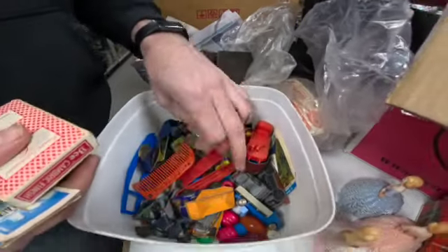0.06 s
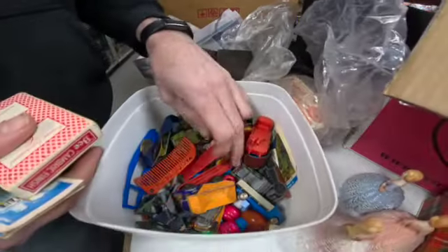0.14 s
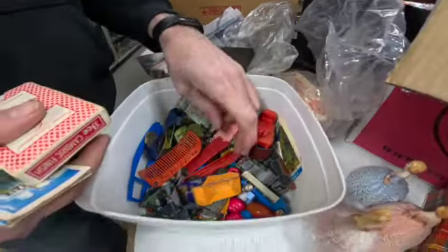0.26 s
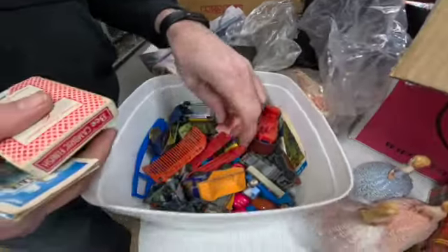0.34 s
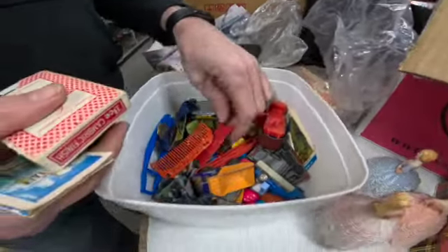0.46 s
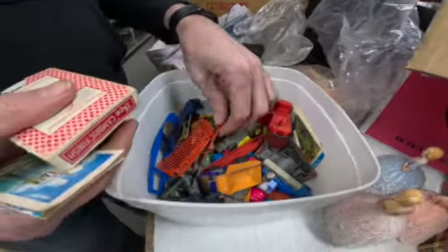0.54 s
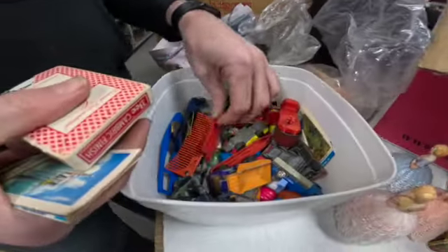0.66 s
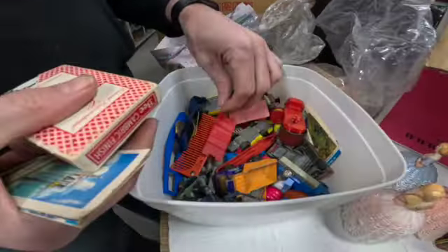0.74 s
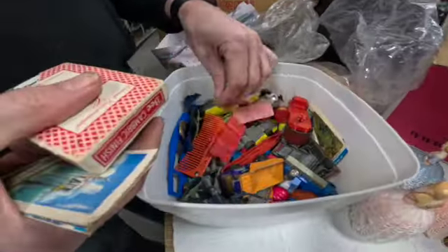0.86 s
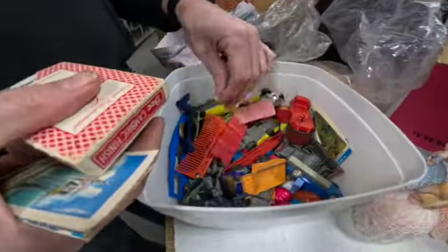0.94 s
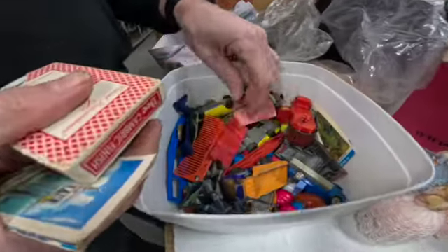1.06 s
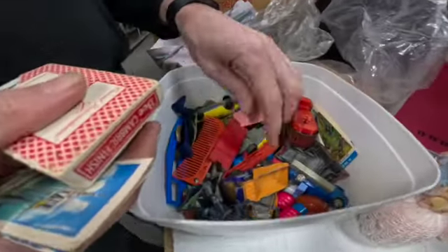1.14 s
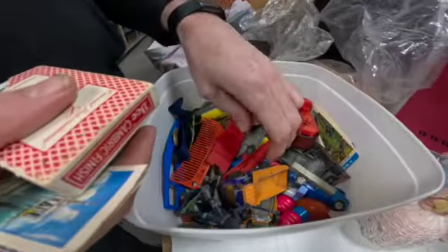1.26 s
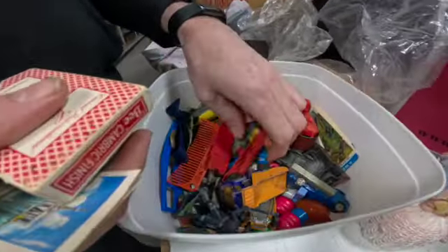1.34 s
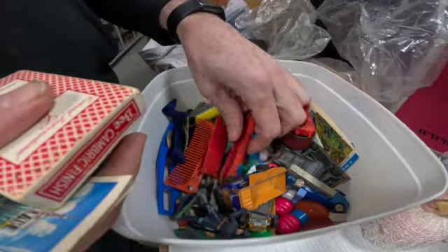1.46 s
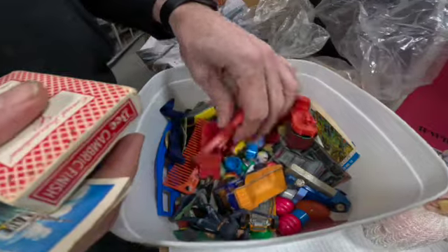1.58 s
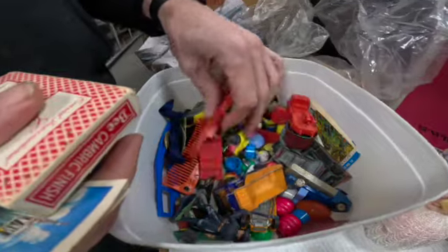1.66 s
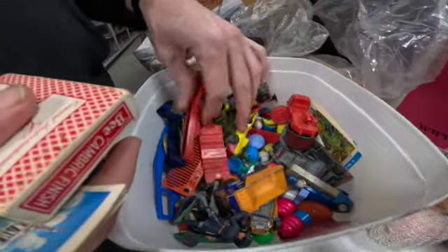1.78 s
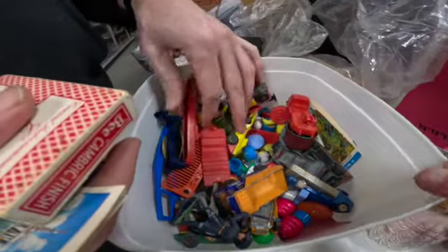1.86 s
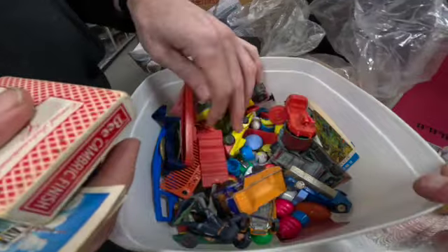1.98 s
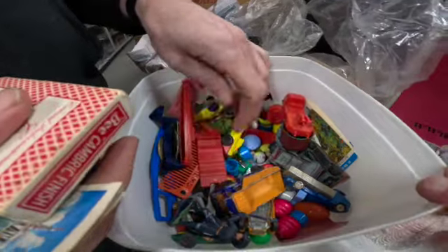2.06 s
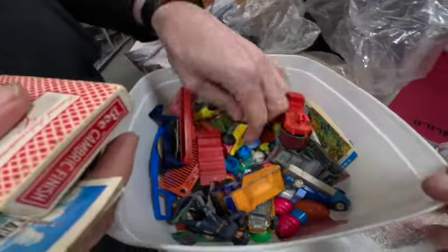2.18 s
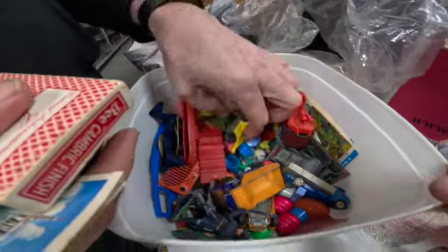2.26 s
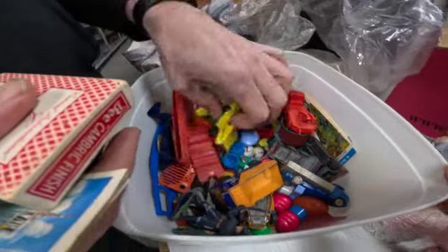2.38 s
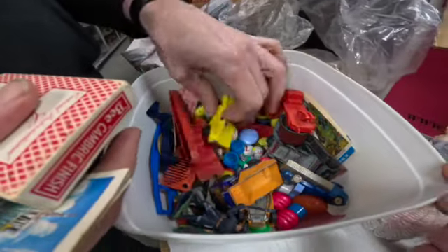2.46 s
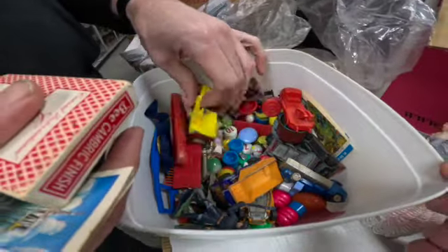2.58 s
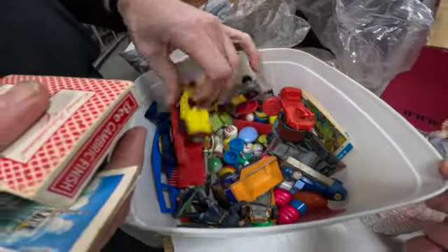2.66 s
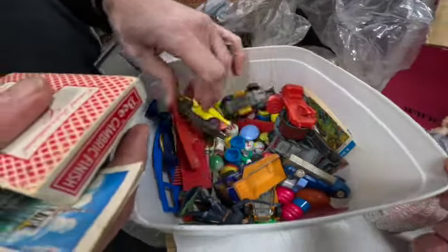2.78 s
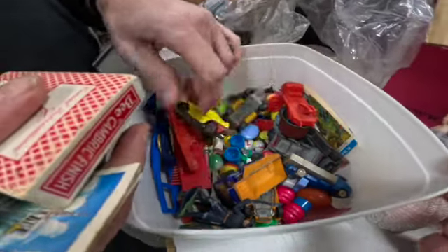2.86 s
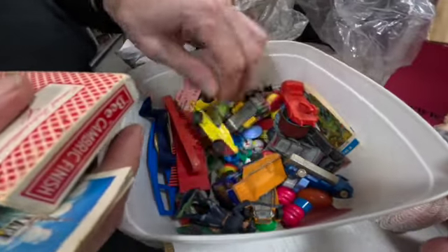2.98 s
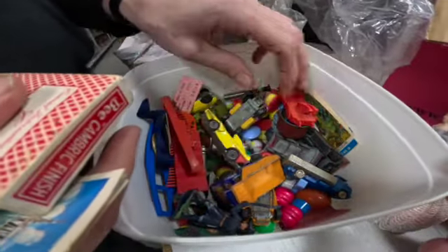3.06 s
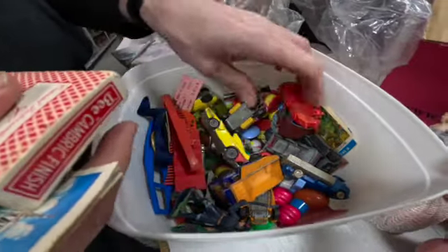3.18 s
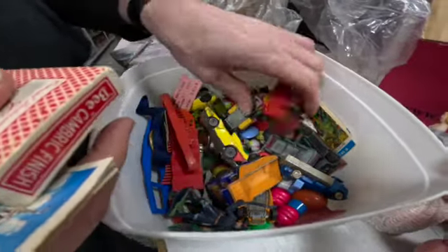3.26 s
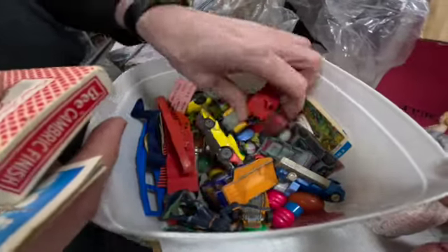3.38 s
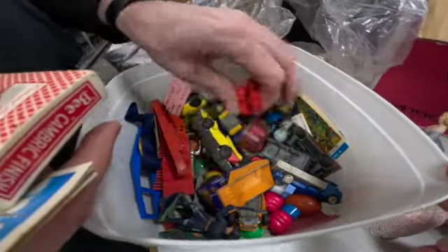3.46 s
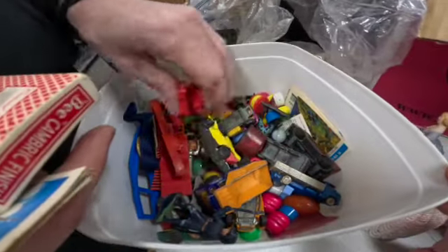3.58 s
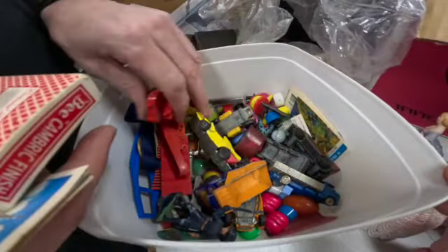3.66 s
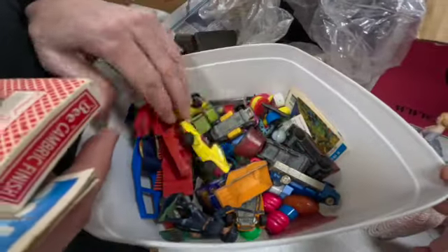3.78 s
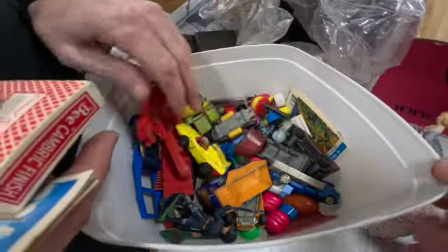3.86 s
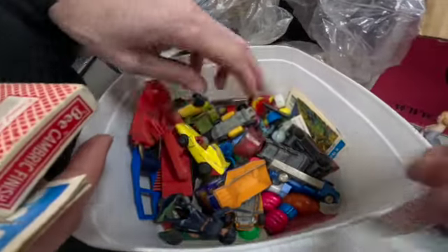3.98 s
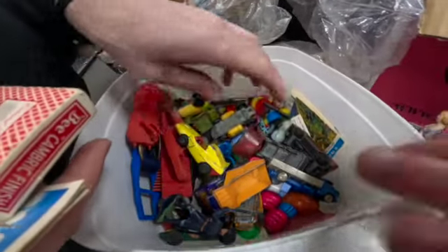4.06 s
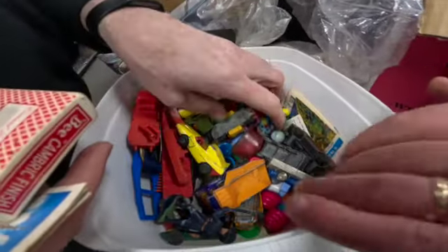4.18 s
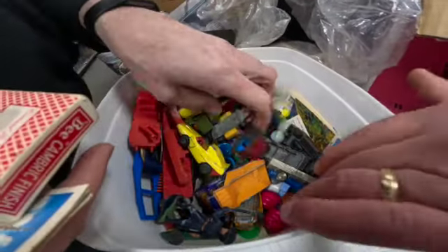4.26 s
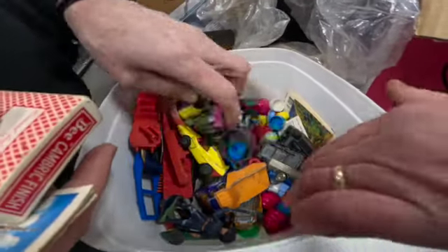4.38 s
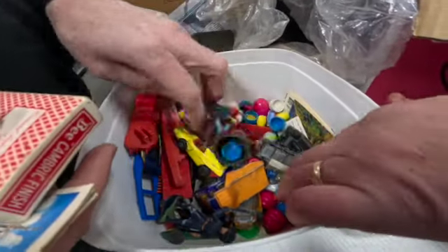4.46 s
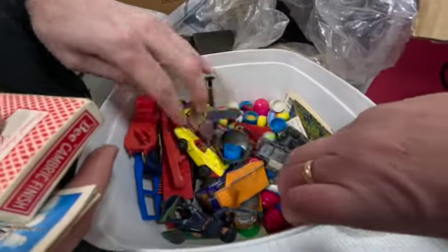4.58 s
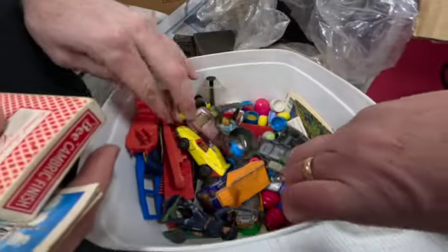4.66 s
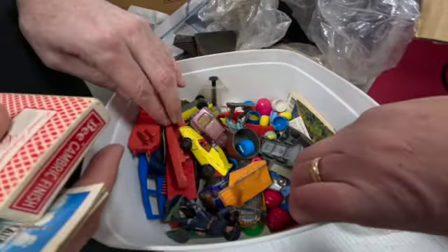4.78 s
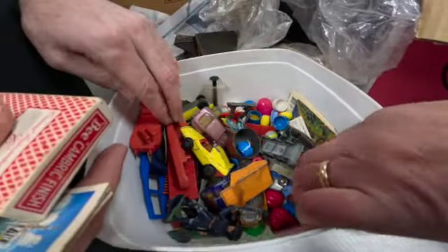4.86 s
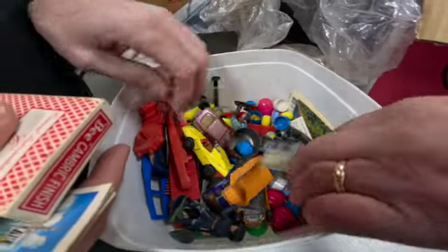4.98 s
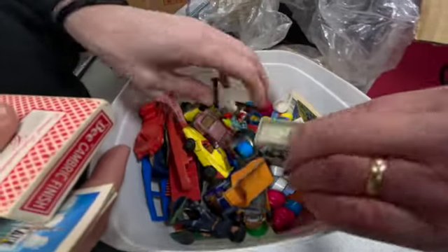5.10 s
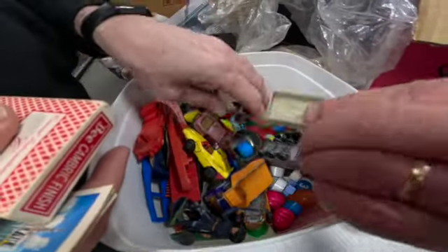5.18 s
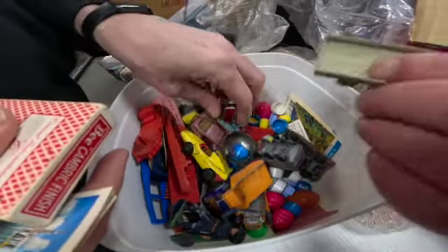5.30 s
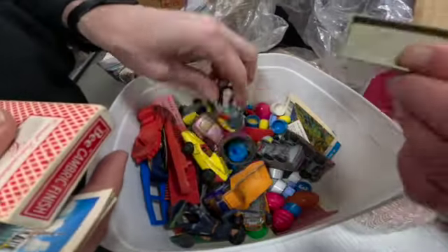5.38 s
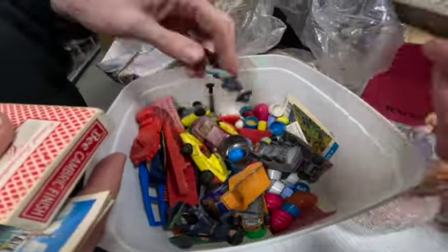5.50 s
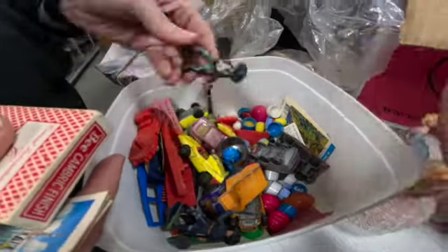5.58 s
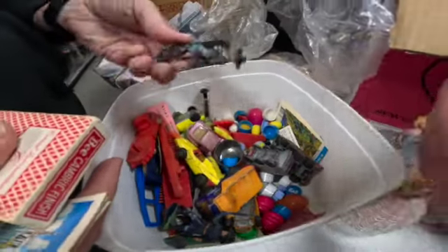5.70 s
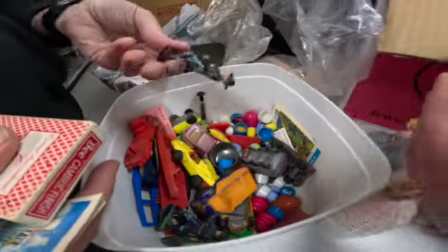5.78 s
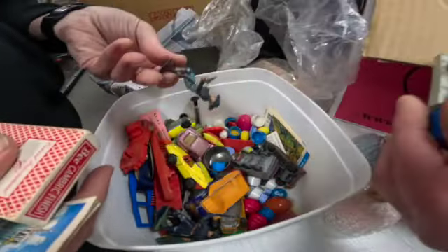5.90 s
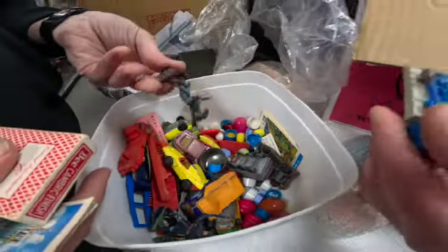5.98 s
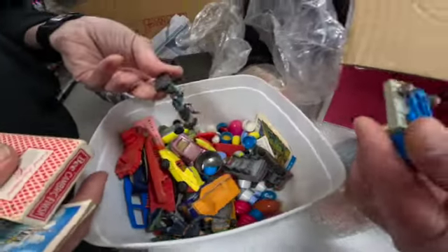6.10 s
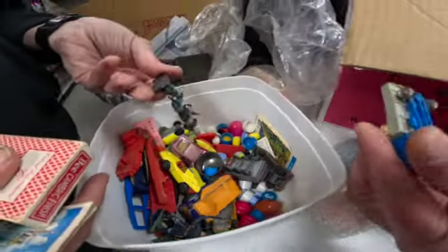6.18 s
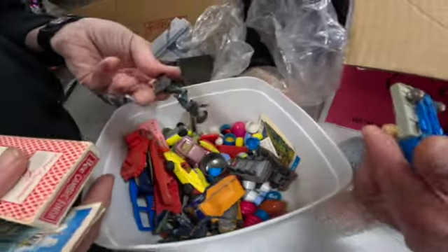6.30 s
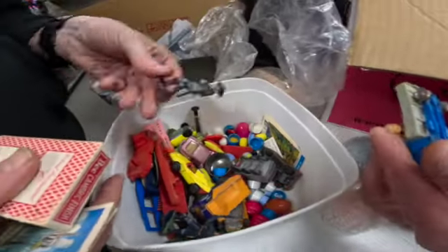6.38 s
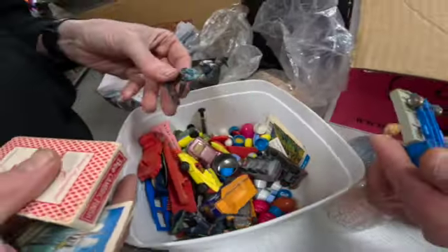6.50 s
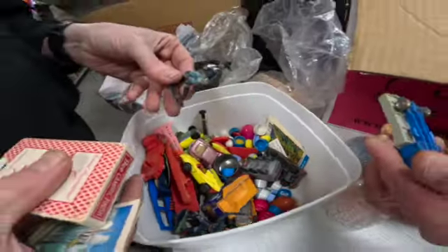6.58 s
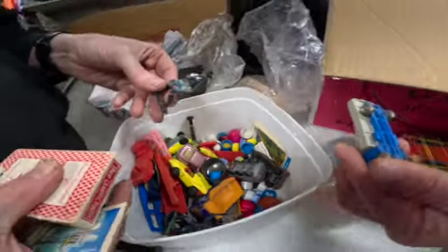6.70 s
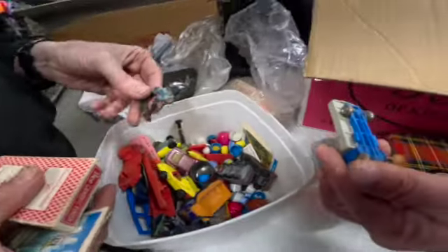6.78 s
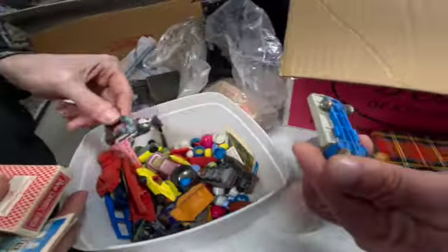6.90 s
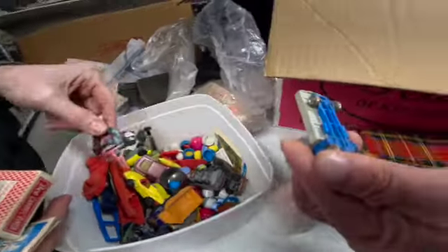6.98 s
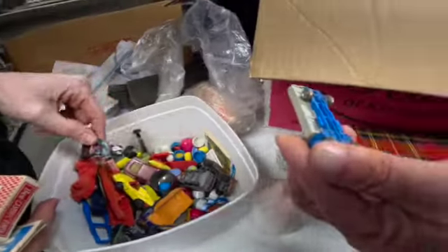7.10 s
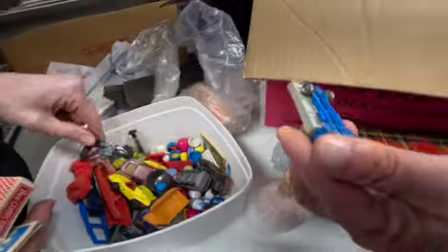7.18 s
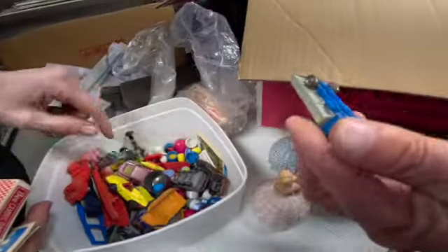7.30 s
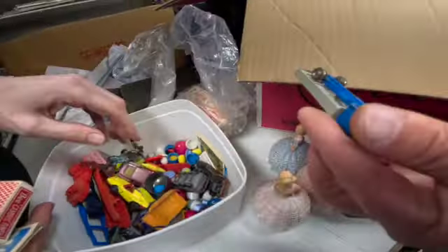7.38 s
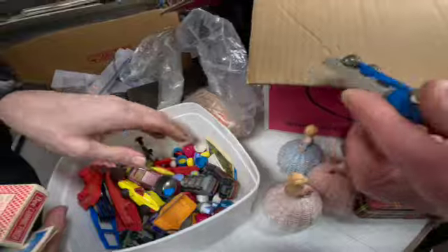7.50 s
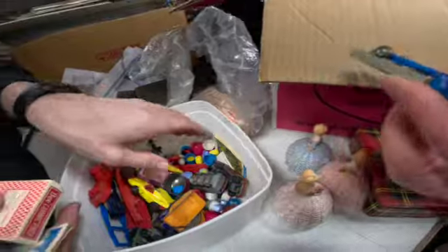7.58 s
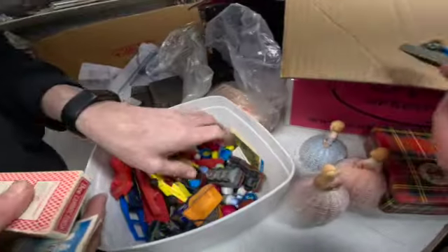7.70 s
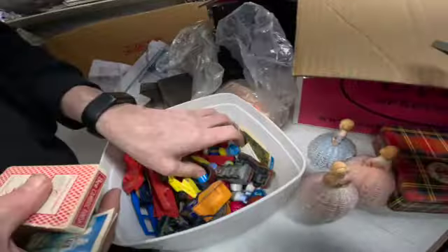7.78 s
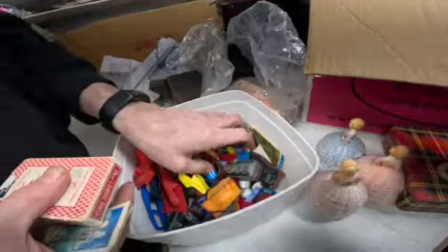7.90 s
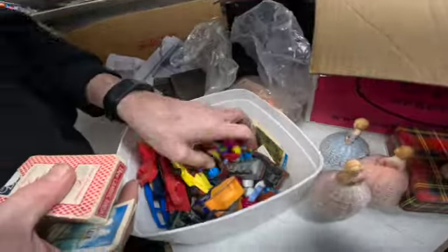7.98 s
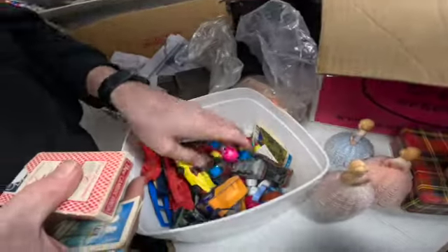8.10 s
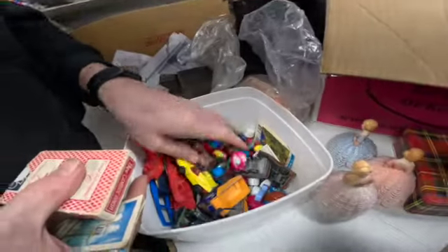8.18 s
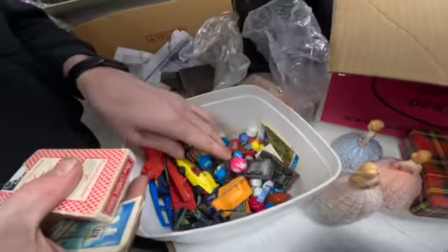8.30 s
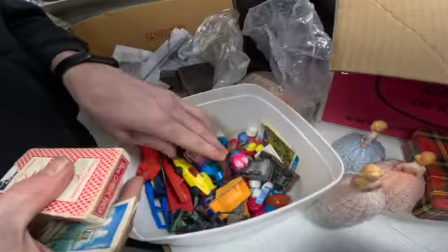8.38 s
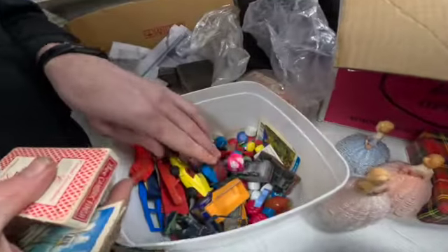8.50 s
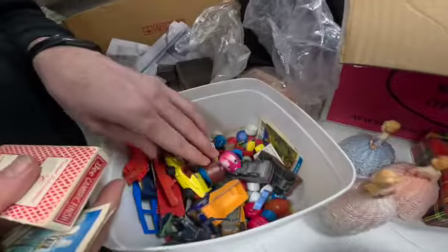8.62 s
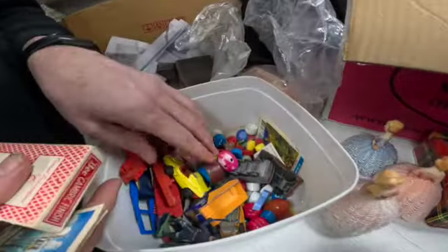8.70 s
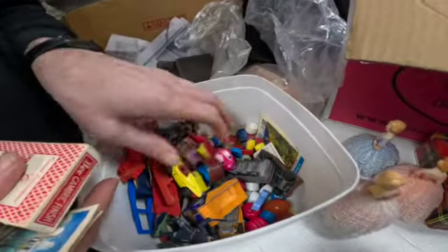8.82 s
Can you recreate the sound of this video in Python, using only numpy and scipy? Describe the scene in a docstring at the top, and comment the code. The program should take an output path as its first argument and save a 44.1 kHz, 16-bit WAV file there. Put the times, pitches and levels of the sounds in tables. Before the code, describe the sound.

A hand rummages through small plastic toys in a plastic tub, clacking and knocking with metallic clinks, pausing almost silent, then stirring again.

```python
"""Plastic toys clack and chatter as a hand stirs them in a plastic tub, close to a stereo microphone in a
cluttered room. The tub knocks and thumps, metal toys clink, a loose part taps and a sleeve brushes past.
Toys are bursts of quickly dying modes, with the tub's and the metal's modes as dying sines; slips and rubbing
fill in each push of the hand. The stirring nearly stops while a toy is held up, then it is put back.
Shaped noise makes the low rumble and faint hiss underneath."""
import sys
import numpy as np
from scipy import signal
from scipy.fft import rfft, irfft
from scipy.io import wavfile
from scipy.ndimage import uniform_filter1d

SR = 44100
rng = np.random.default_rng(int(sys.argv[2]) if len(sys.argv) > 2 else 0)


def dump_mix(stems):
    """Bounce the given channels to the path in sys.argv[1] as a 16-bit WAV at rate SR."""
    frames = np.atleast_2d(stems).T  # one column per channel
    limited = np.clip(frames, -1, 1)  # hard clip at full scale
    pcm = np.round(limited * 32767).astype(np.int16)
    wavfile.write(sys.argv[1], SR, pcm)


N = 390285   # samples in the scene
AGE = np.arange(int(0.11 * SR)) / SR   # seconds since a contact
ATTACK = int(0.011 * SR)   # samples that set the loudness of a contact


def from_db(db):
    """Turns decibels into an amplitude factor."""
    return 10 ** (np.asarray(db) / 20)


def rms_one(x):
    """Scales a sound to rms 1."""
    return x / np.sqrt(np.mean(x ** 2) + 1e-20)


def unit_attack(x):
    """Scales a blow so that its attack has rms 1."""
    return x / np.sqrt(np.mean(x[:ATTACK] ** 2) + 1e-20)


def at_hz(points, hz):
    """Reads a spectrum in dB on a log-frequency axis."""
    point_hz, db = np.transpose(points)
    return np.interp(np.log(hz + 1e-9), np.log(point_hz), db)


def filtered(x, kind, hz, order=2):
    """Passes a sound through a Butterworth filter."""
    sos = signal.butter(order, np.minimum(hz, 0.45 * SR), kind, fs=SR, output="sos")
    return signal.sosfilt(sos, x + 1e-18)


def add(out, s, sound):
    """Mixes a sound in at a time in seconds."""
    i = int(np.clip(s * SR, 0, N - 1))
    out[..., i:i + sound.shape[-1]] += sound[..., :N - i]


def panned(x, right_db):
    """Makes the right side stronger than the left by so many dB."""
    return x * from_db([[-right_db / 2], [right_db / 2]])


def noise(spectrum, side_db):
    """Stereo noise of a given colour and width; rms 1."""
    gain = from_db(at_hz(spectrum, np.arange(N // 2 + 1) * SR / N))
    mid, side = irfft(rfft(rng.standard_normal((2, N))) * gain, N)
    return rms_one(mid + from_db(side_db) * side * [[1], [-1]])


def onset(rise_s, age=AGE):
    """A contact takes a moment to build up its force."""
    return 1 - np.exp(-age / rise_s)


def ring(hz, gain, t60, age=AGE):
    """Modes ring as a sum of dying sines."""
    sines = np.sin(2 * np.pi * np.outer(hz, age))
    decays = np.exp(-np.log(1000) * np.outer(1 / t60, age))
    return gain @ (sines * decays)


def strike(modes, scatter_db, age=AGE):
    """Each point of contact excites the modes with its own strengths and signs."""
    hz, db, t60 = np.transpose(modes)
    gain = from_db(db + rng.normal(0, scatter_db, len(hz)))
    return ring(hz, gain * rng.choice([-1, 1], len(hz)), t60, age)


# Colour of the low rumble. Each row: frequency in Hz, relative level in dB per Hz.
RUMBLE_COLOUR = [(12, -32.5), (20, -4), (40, -4), (75, -8), (114, -4), (147, -15.5), (184, -9), (248, -26),
                 (303, -19), (325, -34.5), (381, -27.5), (600, -55), (780, -92), (1320, -120)]
# The rumble swells and sinks. Each row: time in seconds, level in dB.
RUMBLE_SWELL_DB = [(0, -46), (2, -39), (3.2, -43.5), (5.8, -43.5), (7.2, -38.5), (8.85, -43.5)]


def rumble():
    """Low-pitched noise whose level slowly swells and sinks."""
    s, db = np.transpose(RUMBLE_SWELL_DB)
    level_db = np.interp(np.arange(N) / SR, s, db)
    return from_db(level_db) * noise(RUMBLE_COLOUR, side_db=-29)


# Colour of the steady hiss. Each row: frequency in Hz, relative level in dB per Hz.
HISS_COLOUR = [(350, -34.5), (600, -1.5), (706, -11), (788, -6), (855, -12.5), (993, -3), (1120, -1),
               (4370, -25), (5360, -21.5), (9370, -23.5), (12500, -33.5), (15500, -37)]


def hiss():
    """Faint steady noise, wider than the rumble."""
    return from_db(-66.5) * noise(HISS_COLOUR, side_db=-5.5)


def room(x):
    """A short tail from the clutter and walls, different at each side."""
    t60_s, level_db, cut_hz = 0.17, -28.5, 17000
    age = np.arange(SR // 2) / SR
    tail = filtered(rng.standard_normal((2, len(age))), "low", cut_hz)
    tail = tail * from_db(-60 * age / t60_s) * (age > 0.004)   # nothing returns in the first 4 ms
    tail /= np.sqrt(np.sum(tail ** 2, axis=1, keepdims=True))
    return from_db(level_db) * signal.oaconvolve(x, tail, axes=1)[:, :N]


# Colour of the brushing cloth. Each row: frequency in Hz, relative level in dB per Hz.
CLOTH_COLOUR = [(470, -42.5), (800, -20.5), (1090, -11), (1910, -8), (2530, -5.5), (5100, -10),
                (9180, -15.5), (15000, -38.5)]


def sleeve():
    """Cloth brushes past as the arm reaches back in: noise that swells, holds and sinks."""
    from_s, to_s, level_db, slope_db_per_s = 7.692, 7.98, -43.5, 125
    t = np.arange(N) / SR
    outside_s = np.abs(t - np.clip(t, from_s, to_s))
    return from_db(level_db - slope_db_per_s * outside_s) * noise(CLOTH_COLOUR, side_db=-15)


# A loose part taps, in the pile and as its toy is lifted. Each row: start in seconds, level in dB before trim.
LOOSE_TAPS = [(4.819, -15), (4.831, -27), (4.862, -28), (4.936, -27), (4.991, -14), (5.266, -17),
              (5.334, -22), (5.584, -2), (5.606, -21), (5.632, -20.5), (5.653, -27), (5.677, -33),
              (5.688, -19), (5.743, -26), (5.788, -32), (5.835, -46)]
# Modes of the loose part. Each row: frequency in Hz, relative level in dB, 60 dB decay time in seconds.
LOOSE_PART_MODES = [(1896, -12, .03), (2336, -4.5, 0.0255), (2647, -0.5, 0.015), (3050, -6.5, 0.012),
                    (3734, -18, 0.013), (5990, -17, 0.0087)]


def taps(level_db):
    """Dry, hollow clicks of a toy's loose part, from a few quickly dying modes."""
    out = np.zeros(N)
    for s, db in LOOSE_TAPS:
        click = strike(LOOSE_PART_MODES, scatter_db=1.5) * onset(rise_s=0.00013)
        add(out, s, from_db(db + level_db) * click)
    return out


# Strikes on a metal toy. Each row: start in seconds, level of the upper modes in dB before trim,
# frequency in Hz that answers most, level of the lowest mode in dB before trim.
METAL_CLINKS = [(2.553, -37.5, 7770, -63), (3.335, -19, 8100, -40), (3.362, -24.5, 7000, -21.5),
                (3.478, -30.5, 6290, -45), (3.542, -26, 7770, -23.5), (3.556, -32, 7770, -20.5),
                (3.575, -24, 7770, -50), (3.681, -35, 7000, -44), (3.747, -26, 6290, -26),
                (3.777, -31.5, 6290, -42), (5.449, -26.5, 6290, -43), (5.532, -31, 5940, -45),
                (5.583, -24, 4500, -46), (5.656, -40, 4500, -45), (5.687, -46, 5500, -61),
                (5.743, -27, 5660, -39)]
# Modes of the metal toy. Each row: frequency in Hz, relative level in dB,
# 60 dB decay time in seconds when it hangs free.
METAL_MODES = [(1710, 0.5, 0.14), (4525, 2.5, 0.2), (4890, -17, 0.2), (6290, 6.5, 0.069), (7760, 1, 0.18),
               (9524, -7, 0.31), (9650, -9, 0.14), (10240, -3, 0.1674), (10870, -14, .19),
               (12030, -19.5, .22), (13750, -22, .2), (14450, -26, 0.184)]
LIFTED_FROM_S, LIFTED_TO_S = 5.56, 7.15   # the metal toy hangs clear of the pile
CLINK_FOCUS_DB = 15.5   # upper modes lose this much per octave from the one that answers most
SOFT_TAP_HZ, SOFT_TAP_LOSS_DB = 7000, 6.5   # once lifted it is struck softly: modes above this are weaker


def clinks(level_db, damped=0.69):
    """A metal toy rings on after the plastic ones, longest when lifted clear of the pile."""
    out, age = np.zeros(N), np.arange(SR // 2) / SR
    hz, mode_db, t60 = np.transpose(METAL_MODES)
    rise = onset(rise_s=0.0005, age=age)
    for s, upper_db, centre_hz, lowest_db in METAL_CLINKS:
        buried = not LIFTED_FROM_S < s < LIFTED_TO_S
        off_centre = np.abs(np.log2(hz[1:] / centre_hz))   # octaves
        db = mode_db + np.r_[lowest_db, upper_db - CLINK_FOCUS_DB * off_centre] + level_db
        db = db - SOFT_TAP_LOSS_DB * (not buried) * (hz > SOFT_TAP_HZ)
        # toys that lean on it detune and damp it a little
        held_hz = hz * (1 + buried * rng.normal(0, 0.002, len(hz)))
        held_t60 = t60 * damped ** buried
        gain = from_db(db) * rng.choice([-1, 1], len(hz))
        add(out, s, rise * ring(held_hz, gain, held_t60, age))
    return out


# A second metal piece is struck. Each row: start in seconds, level in dB before trim.
METAL_PINGS = [(7.936, -27), (7.969, -17), (8.299, -42), (8.463, -31), (8.535, -28.5), (8.57, -33),
               (8.683, -22), (8.712, -30.5)]
# Its modes. Each row: frequency in Hz, relative level in dB, 60 dB decay time in seconds.
SECOND_METAL_MODES = [(3280, -24, .05), (5000, -11, .055), (6290, -0.5, 0.12), (6140, 3, 0.035),
                      (8700, -10, 0.037)]


def pings(level_db):
    """A second metal piece answers each strike with a short bundle of dying modes."""
    out, age = np.zeros(N), np.arange(SR // 2) / SR
    rise = onset(rise_s=0.0005, age=age)
    for s, db in METAL_PINGS:
        ping = strike(SECOND_METAL_MODES, scatter_db=1.5, age=age)
        add(out, s, from_db(db + level_db) * rise * ping)
    return out


# The tub's floor is pushed down and bumps. Each row: start in seconds, peak in dB before trim and filter,
# frequency in Hz that answers most.
FLOOR_THUMPS = [(0.122, -25.5, 105), (0.277, -30, 118), (0.873, -17.5, 107), (1.363, -25, 105),
                (1.424, -22, 178), (1.47, -31, 86.1), (1.787, -30, 128), (2.294, -22.5, 184),
                (2.434, -26, 166), (2.619, -19, 88.8), (2.644, -15.5, 178), (3.101, -16.5, 173),
                (4.287, -31, 127), (4.39, -26, 147.6), (4.524, -23.5, 99.8), (5.001, -27.5, 99.6),
                (5.254, -28.5, 206), (5.516, -29, 120)]
# Modes of the loaded floor. Each row: frequency in Hz, relative level in dB, 60 dB decay time in seconds.
LOADED_FLOOR_MODES = [(101.9, 1.5, .11), (156.4, -4, 0.048), (181.6, 2, 0.057), (230, -14.5, 0.17)]


def thumps(level_db, focus_db):
    """A soft push on the loaded floor; where it lands decides which mode answers most."""
    out = np.zeros(N)
    hz, mode_db, t60 = np.transpose(LOADED_FLOOR_MODES)
    for s, db, centre_hz in FLOOR_THUMPS:
        off_centre = np.abs(np.log2(hz / centre_hz))   # octaves
        gain = from_db(mode_db - focus_db * off_centre) * rng.choice([-1, 1], len(hz))
        boom = ring(hz, gain, t60) * onset(rise_s=0.002)
        add(out, s, from_db(db + level_db) * boom / np.abs(boom).max())
    return filtered(out, "low", 400)


# How strongly small toys ring. Each row: frequency in Hz, relative level in dB.
SMALL_TOY_COLOUR = [(1300, 2.5), (2000, 5.5), (3000, 6.5), (5000, -0.5), (6500, 0.5), (8000, -7),
                    (10000, -12.5), (12000, -24), (14500, -30.5)]


def shell(low_hz, high_hz, t60, crack_t60, ring_db, hump_db=5.0, count=10):
    """A small toy: a dense cluster of quickly dying modes in broad humps, and a few modes that ring longer."""
    bins = np.arange(len(AGE) // 2 + 1) * SR / len(AGE)   # Hz
    humps = np.interp(bins, np.geomspace(1000, 16000, 26), rng.normal(0, hump_db, 26))
    colour = from_db(at_hz(SMALL_TOY_COLOUR, bins) + humps)
    cluster = irfft(rfft(rng.standard_normal(len(AGE))) * colour, len(AGE))
    # a fast crack with a weaker, slower tail
    dying = from_db(-60 * AGE / crack_t60) + from_db(-18.5 - 60 * AGE / 0.07)
    crack = filtered(cluster * dying, "band", [low_hz, high_hz], order=3)
    hz = rng.uniform(low_hz, high_hz, count)
    gain = from_db(at_hz(SMALL_TOY_COLOUR, hz) + np.interp(hz, bins, humps)) * rng.standard_normal(count)
    tone = ring(hz, gain, t60 * np.exp(rng.normal(0, 0.57, count)))
    return unit_attack(crack) + from_db(ring_db) * unit_attack(tone)


# Modes of the tub's walls. Each row: frequency in Hz, relative level in dB, 60 dB decay time in seconds.
TUB_MODES = [(147, -9.5, 0.1), (251, -9, 0.037), (384, -4.5, 0.061), (437, -2.5, 0.042), (481.5, -8, 0.051),
             (544.6, 4, 0.039), (633, 0.5, 0.038), (729, -5.5, 0.017), (953, 2.5, 0.026), (1050, 2, 0.036),
             (1128, 0.5, 0.023), (1360, -1, 0.012), (1655, 3, 0.016)]


def contact(chatter_s, chatter_db, rebound_db, count=4):
    """One touch, its quick chatter and a later rebound, as heard from the tub, a toy's shell and its hard edges."""
    force = np.zeros(len(AGE))
    force[0] = 1
    delays = np.r_[rng.uniform(0, chatter_s, count), rng.uniform(0.008, 0.018)]   # chatter, then rebound
    sizes = from_db(np.r_[np.full(count, chatter_db), rebound_db]) * rng.standard_normal(count + 1)
    force[np.clip(delays * SR, 1, len(AGE) - 1).astype(int)] += sizes
    tub = filtered(strike(TUB_MODES, scatter_db=4.0), "low", 2000)
    tub = filtered(tub, "high", 160, order=1)
    clack = shell(1310, 5000, t60=0.012, crack_t60=0.0059, ring_db=-4.0)
    tick = shell(5000, 14000, t60=0.021, crack_t60=0.0066, ring_db=-4)
    rise = onset(rise_s=0.000315)
    heard = [signal.fftconvolve(force, part * rise)[:len(AGE)] for part in (tub, clack, tick)]
    return np.array([unit_attack(part) for part in heard])


def small_contacts(sounds, level_db, per_s, size_db, even_s):
    """Many slips and touches of uneven size that together follow a level."""
    out = np.zeros((2, N))
    for i in np.flatnonzero(rng.random(N) < per_s / SR):
        size = from_db(size_db * min(rng.exponential(), 3.5)) * rng.choice([-1, 1])
        add(out, i / SR, panned(size * sounds[rng.integers(len(sounds))], rng.normal(0, 1.2)))
    # even out the power over a short window before the level is applied
    width = max(int(even_s * SR), 2)
    power = uniform_filter1d(uniform_filter1d(np.mean(out ** 2, axis=0), width), width)
    return from_db(level_db) * out / np.sqrt(np.abs(power) + 1e-4)


# The hand pushes the pile. Each row: start in seconds, length in seconds, level on the tub in dB before trim,
# level among the toys in dB before trim, change over the push in dB.
PUSHES = [(0.0, 0.23, -38.5, -45, 4), (0.275, 0.088, -31.5, -35.5, -1), (0.426, 0.24, -40.5, -40.5, 2),
          (0.728, 0.17, -35, -36.5, -0.5), (0.95, .15, -47.5, -66, -18), (1.126, 0.027, -43.5, -58, -7),
          (1.318, 0.16, -28.5, -27, 11), (1.53, 0.32, -33, -36, -1), (1.916, 0.39, -40, -49, 9),
          (2.228, 0.28, -26.5, -30, 0), (2.588, 0.12, -27, -29, 3), (2.8, 0.11, -36.5, -36, 0),
          (2.937, 0.18, -34, -33, -8), (3.2, 0.066, -42.5, -45, 10.5), (3.311, .26, -32.5, -29, 5),
          (3.627, 0.16, -39.5, -35, 6), (3.794, 0.44, -47.5, -50.5, -11), (4.174, 0.23, -34.5, -42.5, 2),
          (4.298, 0.26, -28, -25, -3.5), (4.608, .26, -41, -38, 1), (4.962, 0.19, -35, -35.5, -2.5),
          (5.201, 0.26, -31, -34.5, 10.5), (5.56, 0.15, -55.5, -42, -14), (7.203, 0.11, -49, -52.5, 7),
          (7.306, .15, -44.5, -49, -1), (7.576, 0.17, -47.5, -61, -5), (7.715, 0.14, -42.5, -40, 15),
          (7.881, 0.15, -32.5, -26, -10), (8.032, 0.12, -31, -25, 3), (8.243, 0.11, -32.5, -26.5, -6),
          (8.352, 0.15, -42.5, -35, 2)]


def effort(levels_db, settle_db_per_s):
    """Level of the moving pile in dB: each push builds up, leans in or eases off, and settles."""
    attack_s = 0.012
    t = np.arange(0, N, 64) / SR
    power = 1e-12
    for (s, length, _, _, change_db), db in zip(PUSHES, levels_db):
        attack = np.clip((t - s) / attack_s + 0.5, 0, 1)
        held_db = db + change_db * (np.clip((t - s) / length, 0, 1) - 0.5)
        settling_db = settle_db_per_s * np.maximum(t - s - length, 0)
        power = power + (attack * from_db(held_db - settling_db)) ** 2
    return np.interp(np.arange(N) / SR, t, 10 * np.log10(power))


def shifting_pile(touches, body_db, toys_db, tick_db, rub_db):
    """Toys slide over the tub's floor and over each other; skin rubs softly on plastic between the slips."""
    _, _, on_tub, among_toys, _ = np.transpose(PUSHES)
    body = effort(on_tub, settle_db_per_s=147)
    toys = effort(among_toys, settle_db_per_s=190.5)
    tick_gain = from_db(tick_db + rng.normal(0, 4.5, (len(touches), 1)))
    edges = touches[:, 1] + touches[:, 2] * tick_gain
    skin = rms_one(filtered(noise(SMALL_TOY_COLOUR, side_db=-12.5), "high", 1100))
    rub = from_db(toys + rub_db) * skin
    tub_slips = small_contacts(touches[:, 0], body + body_db, per_s=330, size_db=4.5, even_s=0.025)
    toy_slips = small_contacts(edges, toys + toys_db, per_s=300, size_db=6.5, even_s=0.07)
    return tub_slips + toy_slips + rub


def shares(over_db):
    """Splits unit power between two parts, the first stronger by so many dB."""
    ratio = from_db(over_db)
    return ratio / np.hypot(1, ratio), 1 / np.hypot(1, ratio)


# The distinct blows, loud and faint. Each row: start in seconds, strength in dB before trim,
# tub over toy in dB before trim, hard edge over hollow shell in dB before trim.
DISTINCT_BLOWS = [(0.121, -19.5, 8.5, -11), (0.189, -30.5, 21, -2.0), (0.274, -20, 11.5, -5),
                  (0.328, -25, 9, 11), (0.39, -30.0, -21.0, -1), (0.495, -30, -4, -13),
                  (0.527, -33.5, -21.0, -15), (0.565, -24.5, -4.5, -1), (0.602, -31, 4.5, -2.0),
                  (0.863, -23.0, 1, -6), (0.874, -18.5, 9, -5.5), (1.136, -31, 25, -6),
                  (1.158, -31.5, 19, -7), (1.304, -36.0, 2, 0.5), (1.328, -23.0, -6, -16),
                  (1.364, -20.5, 14.0, -5), (1.412, -18, 6.5, 7.0), (1.442, -23, 1, 3),
                  (1.461, -21.5, 1.0, 9.5), (1.557, -27.5, -18.0, -22), (1.66, -27, -13, -10),
                  (1.686, -20.5, -3, -4.5), (1.769, -21, -1, -4.5), (1.79, -22.5, 0, -1),
                  (1.847, -23.0, 15, -2.0), (1.97, -29.5, 6, -11), (2.029, -28.5, -1, -3),
                  (2.201, -23.5, 6, -22.0), (2.276, -18, 3, -5.5), (2.298, -19.5, 6, -1.0),
                  (2.318, -21.0, 15, -6.0), (2.428, -19.5, 14, -6.0), (2.438, -22, 7.0, -12),
                  (2.506, -21, 2, -2.5), (2.553, -20, -2.5, 13.5), (2.611, -23, -3, 9),
                  (2.642, -22.5, 5, 11.5), (2.653, -20.5, 18, 5.5), (2.695, -26.5, 1, 11),
                  (2.806, -23, 1.5, -2), (2.831, -23, -3, -4), (2.863, -29, 0, 5), (2.944, -22, -8, -4.5),
                  (2.965, -21.5, -7.5, -7), (3.026, -24, -3, 1), (3.103, -15.0, -5, 0.0),
                  (3.143, -25, -4.5, -1.5), (3.24, -37, -9, -9.5), (3.256, -28.5, -1.5, -13.5),
                  (3.318, -25, -7, -10.5), (3.333, -21.5, -9, -3), (3.36, -20.5, -1, -15),
                  (3.378, -24.5, -15, -9), (3.418, -28, 15, -1), (3.478, -23, -9, -6),
                  (3.507, -21, -7, -2.5), (3.526, -21, -9, 2), (3.54, -23.5, -24, 3.5),
                  (3.572, -23.5, -14, 12), (3.636, -23.5, -1.0, -6), (3.683, -19.0, -1.5, 3.5),
                  (3.86, -35.0, -13.0, -12.0), (4.16, -35.5, 0, -2), (4.181, -20, 2.5, -1.5),
                  (4.211, -26, 0.5, -9), (4.243, -29, 12.0, 0.5), (4.274, -22, 7, -7),
                  (4.29, -19, 8.5, -4.5), (4.357, -22.5, 13, -15), (4.408, -23, -6, 6),
                  (4.432, -21.5, -3, 4), (4.488, -22.5, -21, 2.5), (4.506, -21, -13.0, -7),
                  (4.535, -18, -23, 12), (4.56, -18.5, 2, 5.5), (4.593, -18.5, 16, -3),
                  (4.628, -22, -8, -30), (4.647, -24.5, -11, -27), (4.746, -29.0, -2, -16.0),
                  (4.796, -32.5, 2, -8.0), (4.819, -36.5, -28, -22), (4.936, -34.5, -14, -24.0),
                  (4.98, -29, -8, -19.0), (4.989, -26.5, -8, -5), (5.009, -20, -9.5, -2.5),
                  (5.049, -27.5, 1, -16.0), (5.084, -26.5, 25.0, -7), (5.113, -26.5, -6, 3.5),
                  (5.283, -27.5, 0, -22.0), (5.31, -30, -17.0, -14), (5.367, -27.5, 0, -8.5),
                  (5.449, -21.5, 10, 7.5), (5.49, -17.5, 5.5, -3.5), (5.515, -21, 5, -12.5),
                  (5.582, -17.5, -17, -2), (5.888, -58, -12.0, 1), (5.995, -60.5, -11, -3.5),
                  (7.189, -33.5, 3.5, -4), (7.204, -32, 14, -16), (7.296, -31, -13, 0.0),
                  (7.308, -25.0, -13, 3), (7.346, -28.5, -2, -13), (7.38, -39, -11.5, 0),
                  (7.401, -35.5, 2.0, -24), (7.435, -40, 1, -8), (7.643, -39.5, 15.0, 8.0),
                  (7.741, -28.5, -3, -8), (7.82, -28.5, -4, -8.0), (7.892, -25, -9, 0),
                  (7.919, -18.5, -6.5, -3), (7.947, -25.0, -1, -2), (8.081, -20.0, -17, 4),
                  (8.101, -21.5, 6, -13), (8.116, -19, -1.5, -5), (8.134, -24, 1, 0),
                  (8.151, -17.5, -5, 11), (8.172, -23.5, -12, 4.0), (8.228, -26, 5, 5),
                  (8.281, -23, -10, 8), (8.299, -28, -13, -5), (8.355, -25.5, -18, 2),
                  (8.393, -25.5, -28, -6), (8.464, -24, -20, -5), (8.544, -26, -8.5, -10),
                  (8.577, -29.5, -19, 0.0), (8.621, -44.5, -11, -24), (8.654, -26, -10, -15.0),
                  (8.682, -20.5, -7, -3), (8.694, -23.5, -5.5, -6), (8.754, -46.5, 9, -12),
                  (8.811, -47, -1.5, -12)]


def knocks(touches, body_db, clack_db, tick_db, spread_db):
    """The distinct blows: each shares its strength between the tub, a toy's shell and its hard edge."""
    out = np.zeros((2, N))
    picks = rng.integers(0, len(touches), 400)
    places = rng.normal(0, spread_db, 400)   # right over left, dB
    for (s, db, tub_db, edge_db), pick, place in zip(DISTINCT_BLOWS, picks, places):
        tub, toy = shares(tub_db)
        edge, hollow = shares(edge_db)
        trims_db = np.array([body_db, clack_db, tick_db])
        gains = np.array([tub, toy * hollow, toy * edge]) * from_db(db + trims_db)
        add(out, s, panned(gains @ touches[pick], place))
    return out


def scene(count=64):
    """The toys in their room, the sleeve and the background."""
    blows = np.array([contact(chatter_s=0.006, chatter_db=-6.5, rebound_db=-8) for _ in range(count)])
    slips = np.array([contact(chatter_s=0.004, chatter_db=-9, rebound_db=-14.5) for _ in range(count)])
    toys = knocks(blows, body_db=0.1, clack_db=-0.12, tick_db=0.5, spread_db=2.5)
    toys = toys + shifting_pile(slips, body_db=-0.5, toys_db=-1.1, tick_db=-6, rub_db=-9.5)
    toys = toys + thumps(level_db=1.0, focus_db=7)
    toys = toys + clinks(level_db=3.0) + pings(level_db=1.5) + taps(level_db=-5)
    return toys + room(toys) + sleeve() + rumble() + hiss()


def record(dry):
    """The right port takes more lows, the left more highs; top treble is partly out of phase, rolls off and is cut."""
    lows = filtered(dry, "low", 6000, order=1)
    heard = panned(lows, right_db=1.8) + panned(dry - lows, right_db=-1.0)
    # a delayed copy of the top treble joins the two ports with opposite signs
    top = np.roll(filtered(heard.mean(axis=0), "high", 11700, order=4), shift=9)
    heard = filtered(heard + from_db(-7) * top * [[1], [-1]], "low", 14000)
    steep_cut = signal.cheby2(14, 70, 16900, fs=SR, output="sos")   # 70 dB down from 16900 Hz
    return signal.sosfilt(steep_cut, heard)


dry = scene()
out = record(dry)
dump_mix(out)
```